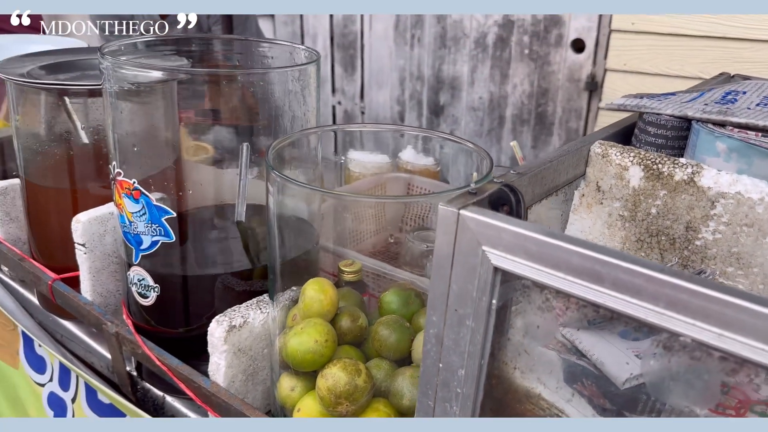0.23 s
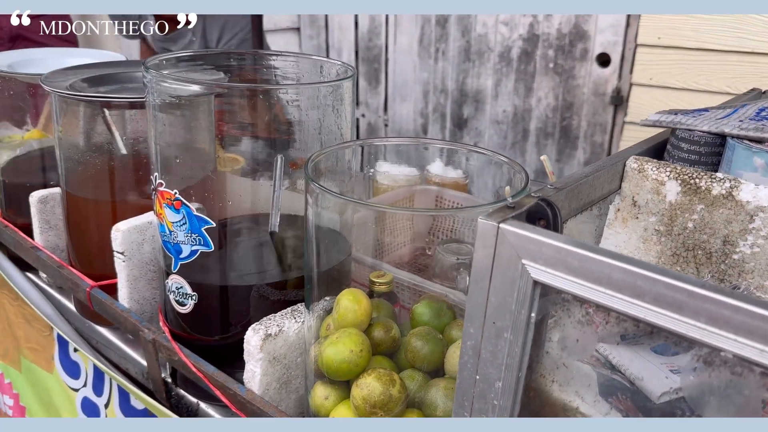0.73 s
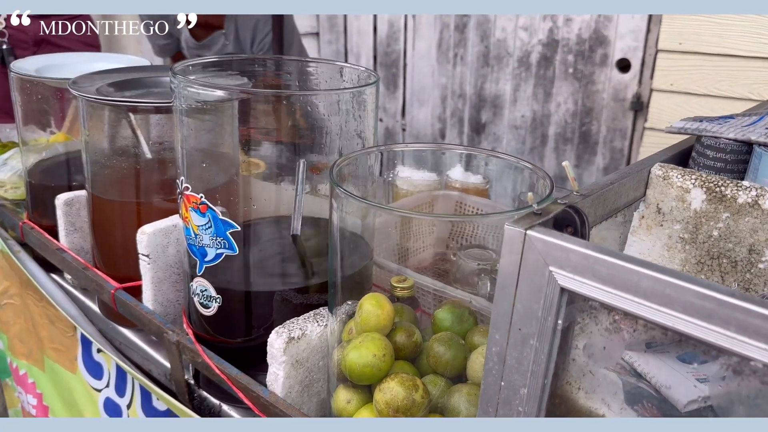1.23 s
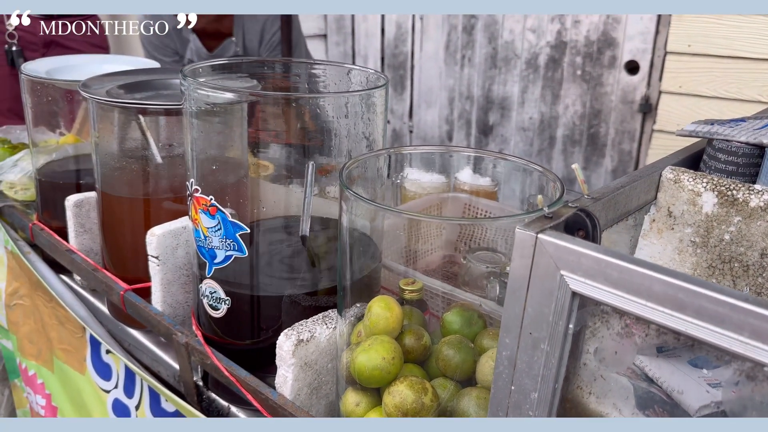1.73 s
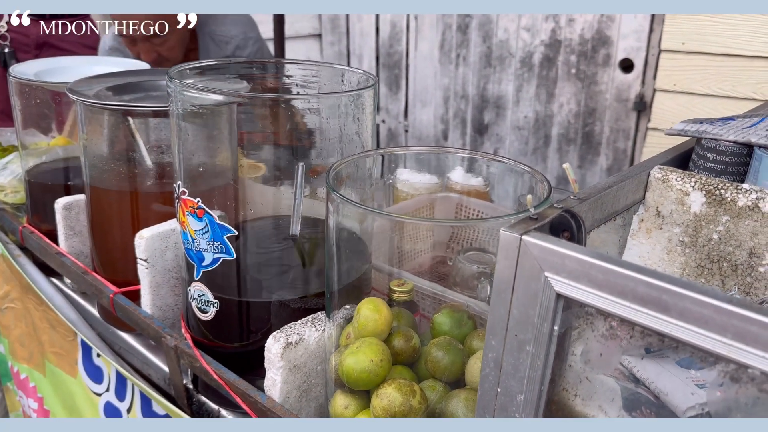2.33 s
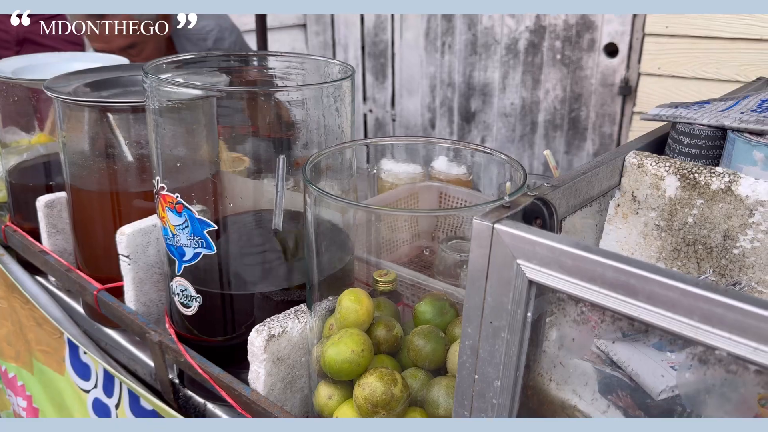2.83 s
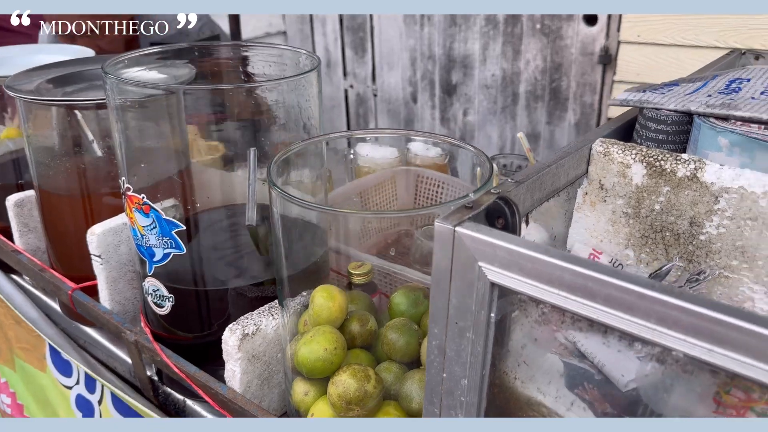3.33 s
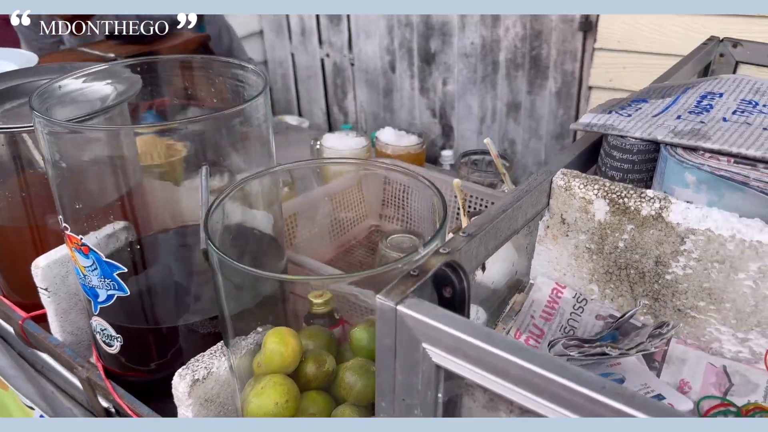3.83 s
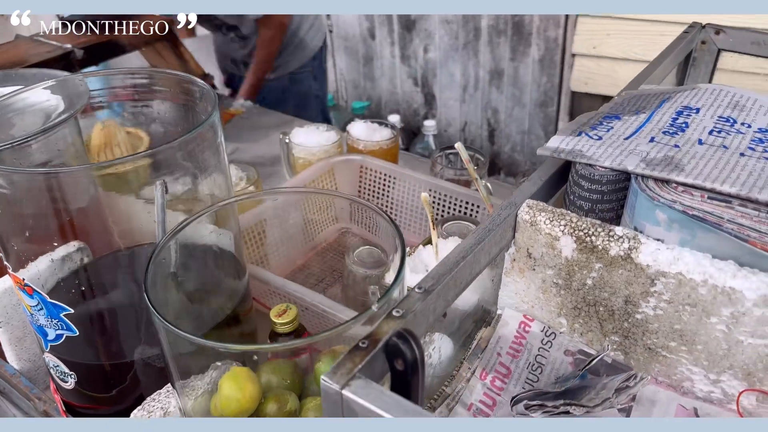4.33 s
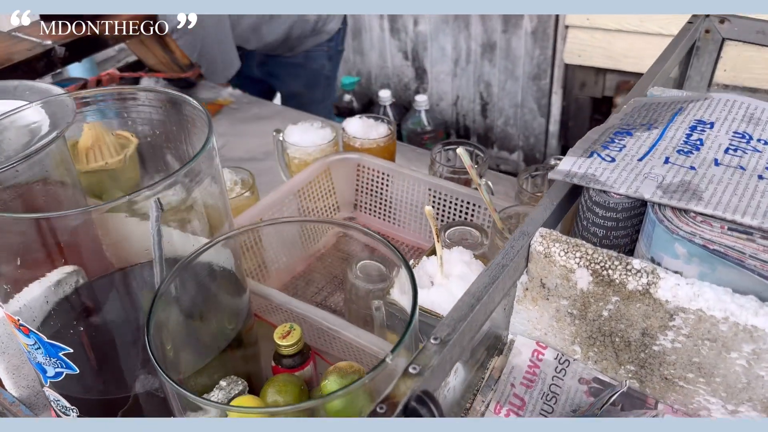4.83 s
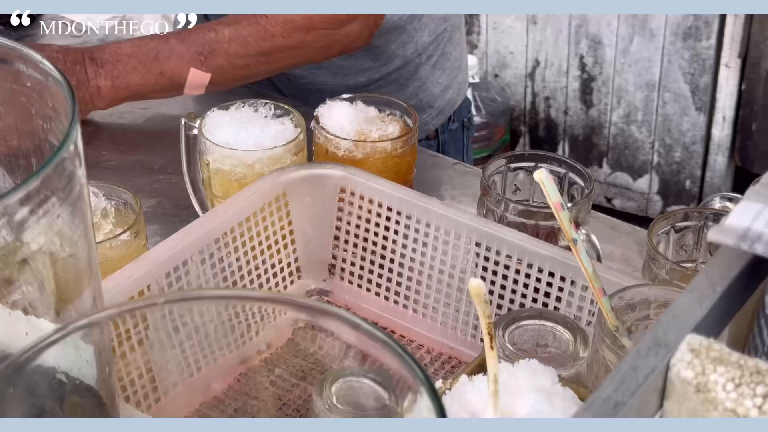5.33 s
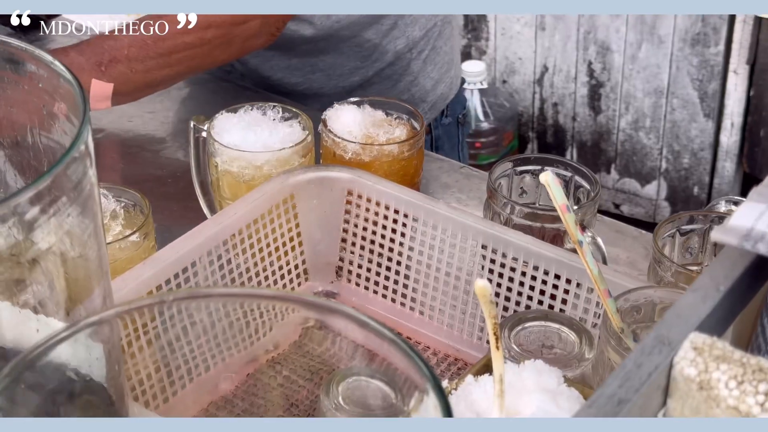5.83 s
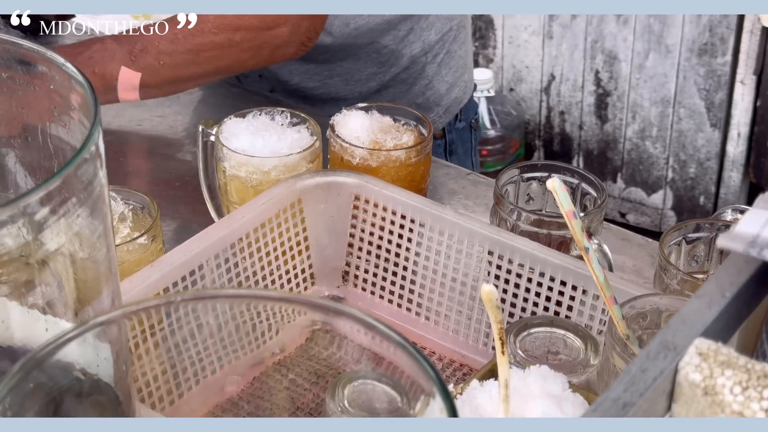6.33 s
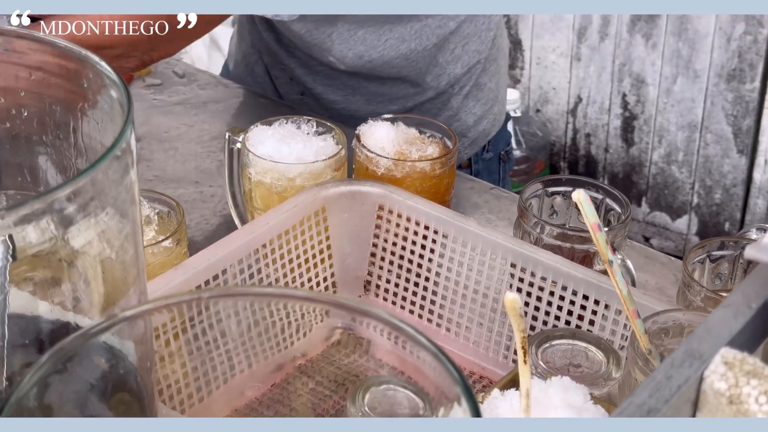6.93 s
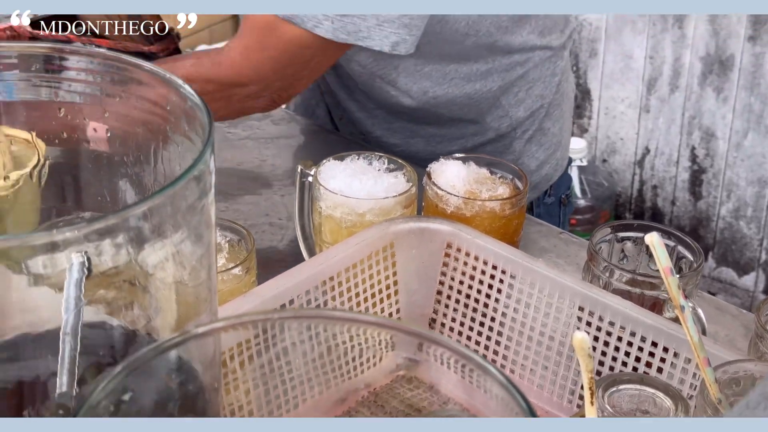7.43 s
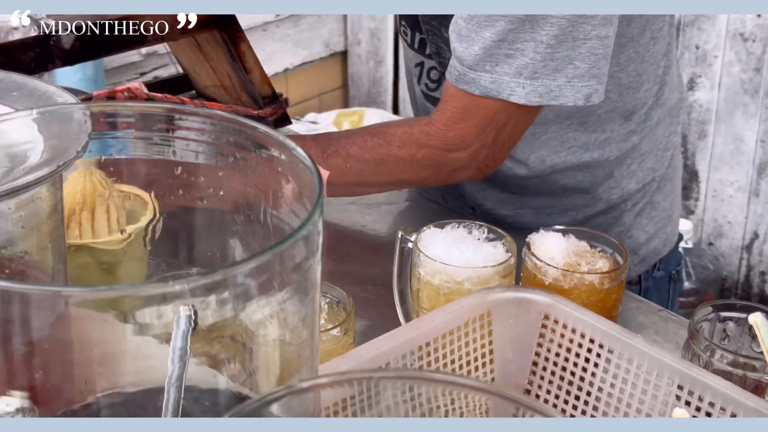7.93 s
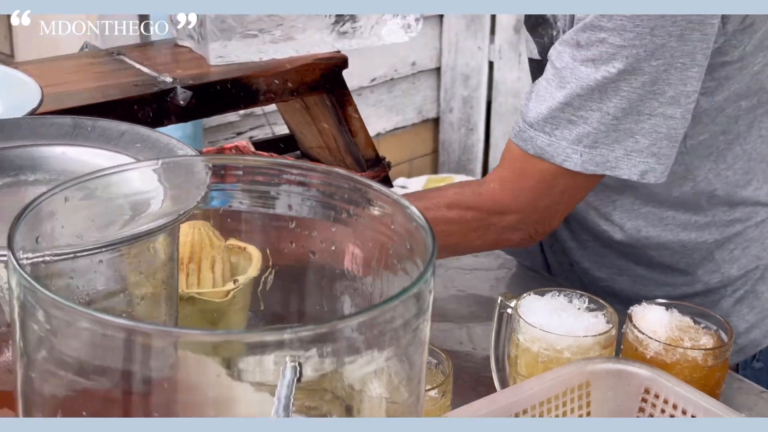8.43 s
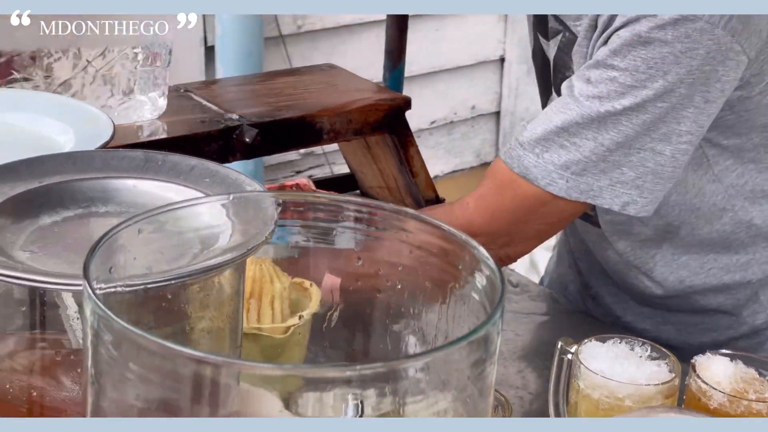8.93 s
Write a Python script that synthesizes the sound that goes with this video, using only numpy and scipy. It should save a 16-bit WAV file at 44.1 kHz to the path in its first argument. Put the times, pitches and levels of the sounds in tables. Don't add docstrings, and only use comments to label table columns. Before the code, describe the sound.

Quiet street hum, rustles, soft knocks and a far dove, then loud crunching strokes of ice pushed over a wooden plane close by.

```python
import sys
import numpy as np
from scipy import signal
from scipy.fft import rfft, irfft
from scipy.io import wavfile
from scipy.ndimage import uniform_filter1d

SR = 44100
rng = np.random.default_rng(int(sys.argv[2]) if len(sys.argv) > 2 else 0)


def transcribe(u):
    v = np.clip(np.atleast_2d(u).T, -1, 1)
    q = np.round(v * 32767).astype(np.int16)
    wavfile.write(sys.argv[1], SR, q)


def invert_db(level):
    return 10 ** (np.asarray(level, dtype=float) / 20)


N = 404838
T = np.arange(N) / SR
CLOSE_S = 5.36


def evened(x):
    return x / np.sqrt(np.mean(x ** 2) + 1e-20)


def read(points, hz):
    f, value = np.transpose(points)
    return np.interp(np.log(hz + 1), np.log(f + 1), value)


def colour(x, gain):
    return irfft(rfft(x) * gain(np.fft.rfftfreq(x.shape[-1], 1 / SR)), x.shape[-1])


def shaped(x, spectrum):
    return colour(x, lambda hz: invert_db(read(spectrum, hz)))


def band_even(x, lo_hz, hi_hz):
    return x / np.std(colour(x[0], lambda hz: (hz > lo_hz) & (hz < hi_hz)))


def smooth_twice(x, span):
    return uniform_filter1d(uniform_filter1d(x, span), span)


def drift(n, span):
    return evened(smooth_twice(rng.standard_normal(n), round(span)))


def patchy(x, patch_db, size=256):
    z = signal.stft(x, nperseg=size)[2]
    field = uniform_filter1d(rng.standard_normal(z.shape[1:]), 3, 0)
    field = evened(uniform_filter1d(field, 6, 1))
    return signal.istft(z * invert_db(patch_db * field), nperseg=size)[1][:, :x.shape[1]]


def resonate(x, hz, width):
    r = np.exp(-np.pi * width / SR)
    return signal.lfilter([1 - r, 0, r - 1], [1, -2 * r * np.cos(2 * np.pi * hz / SR), r * r], x)


def glide(x, hz, width):
    turn = np.exp(2j * np.pi * np.cumsum(hz) / SR)
    r = np.exp(-np.pi * width / SR)
    smooth = signal.lfilter([1], np.convolve([1, -r], [1, -r]), x / turn)
    return evened((turn * smooth).real)


def streak(start, stop, from_hz, to_hz, db, width):
    hz = np.geomspace(from_hz, to_hz, round((stop - start) * SR))
    drive = rng.standard_normal((2, len(hz)))
    return start, invert_db(db) * np.hanning(len(hz)) * glide(drive, hz, width)


def noise(spectrum, lo_hz, hi_hz, patch_db):
    x = shaped(patchy(rng.standard_normal((2, N)), patch_db, size=1024), spectrum)
    return band_even(x, lo_hz, hi_hz)


def fractures(n, per_s, spread_db, chatter_db):
    chatter = drift(n, 180)
    size = invert_db(spread_db * np.minimum(rng.exponential(1, n), 4))
    size = size * (rng.random(n) < per_s / SR)
    return (evened(size) + 1.65) * invert_db(chatter_db * chatter) * rng.standard_normal((2, n))


def swells(start, length, db, rise_db_per_s, fall_db_per_s):
    t, out = T[::64], 0
    for s, hold, top_db in np.broadcast(start, length, db):
        rise_db = rise_db_per_s * np.maximum(s - t, 0)
        fall_db = fall_db_per_s * np.maximum(t - s - hold, 0)
        out = out + invert_db(2 * (top_db - rise_db - fall_db))
    return np.interp(T, t, out)


def add(mix, s, sound):
    part = mix[:, round(s * SR):][:, :sound.shape[1]]
    part += sound[:, :part.shape[1]]


# frequency in Hz, density in dB per Hz.
RUMBLE = [(12, -55), (20, -38), (33, -8.5), (86, 2), (124, -2), (182, -6.5), (214, -7.5), (260, -25),
          (340, -55), (570, -120)]


def rumble():
    return noise(RUMBLE, 40, 180, patch_db=-1.0) * invert_db(np.where(T > CLOSE_S, -46, -45))


# frequency in Hz, width in Hz, level in dB.
HUM = [(495.3, 22, -51), (1443, 70, -57), (890, 110, -55), (210, 14, -51.5), (2230, 40, -60)]
# from and to, both in seconds.
HUM_SPANS = [(-1, 4.3), (.7, 4.2), (.2, 2), (3.6, 6.4), (3.5, 4.)]


def hums():
    drive = rng.standard_normal(N)
    out = np.zeros(N)
    for (start, stop), (hz, width, db) in zip(HUM_SPANS, HUM):
        fade = np.clip(np.minimum(T - start, (stop - T) / 3) / .3, 0, 1)
        tone = np.cos(2 * np.pi * np.cumsum(hz + .12 * width * drift(N, 1500)) / SR)
        band = evened(resonate(resonate(drive, hz, width), hz, width))
        out += invert_db(db - 1 + drift(N, 3400)) * fade * (tone + .6 * band)
    return out


# start in seconds, length in seconds, treble in dB, body in dB.
RUSTLES = [(0.15, 0.18, -48, -43.5), (0.335, 0.21, -44, -41.5), (0.596, 0.12, -41, -40.5),
           (0.882, 0.062, -47, -42), (1.073, 0.074, -45.5, -45), (1.287, 0.075, -50.5, -47.5),
           (1.454, .2, -47.5, -62), (1.74, 0.088, -50, -54), (1.927, 0.033, -51, -48),
           (2.35, 0.083, -50.5, -67), (2.539, 0.2, -50, -44.5), (2.995, 0.038, -53.5, -58),
           (3.5, 0.027, -62, -59), (4.235, 0.15, -52, -47), (4.78, 0.051, -48, -48.5),
           (4.892, 0.028, -52.5, -48), (5.12, 0.055, -50.5, -45.5)]


def rustle_power(column):
    rows, rise_s = np.array(RUSTLES), 0.026
    return swells(rows[:, 0] + rise_s, rows[:, 1] - rise_s, rows[:, column], 12 / rise_s, 85)


# frequency in Hz, density in dB per Hz.
RUSTLE = [(1200, 2.5), (2500, 0), (4000, -0.5), (7000, -4.5), (10000, -1.5), (13000, -4.5), (16000, -5)]


def rustling():
    leaves = invert_db(2 * (-52 - T))
    level = np.sqrt(rustle_power(column=2) + leaves)
    crackle = fractures(N, per_s=6000, spread_db=1.5, chatter_db=.8)
    crackle = shaped(patchy(crackle, patch_db=2.2), RUSTLE)
    return band_even(crackle, 1770, 10600) * np.where(T > CLOSE_S, invert_db(-58.5), level)


def traffic(wash):
    far = np.sqrt(rustle_power(column=3) + invert_db(2 * (-45.5 - 0.24 * T)))
    near = np.sqrt(invert_db(2 * -51) + drone())
    return wash * np.where(T > CLOSE_S, near, far * invert_db(-1.5))


# start in seconds, length in seconds, pitch in Hz, level in dB.
COOS = [(1.47, .07, 1170, -61), (1.73, .05, 1180, -61), (1.87, .1, 1185, -55), (2.1, .11, 1185, -55),
        (2.36, .13, 1180, -55), (2.67, .13, 1160, -55), (3.67, .12, 1900, -59)]


def dove():
    out = np.zeros((2, N))
    for s, length, hz, db in COOS:
        u = np.linspace(0, 1, round(length * SR))
        pitch = hz * (1 + .01 * np.sin(np.pi * u) - .035 * u ** 4)
        note = np.sin(2 * np.pi * np.cumsum(pitch) / SR)
        add(out, s, invert_db(db) * signal.windows.tukey(len(u), .5) * note * [[-.8], [1.2]])
    return out


# from and to in seconds, from and to in Hz, level in dB.
SCUFFS = [
    (5.05, 5.36, 196, 260, -45),
    (0.55, .72, 173, 164, -43),
    (4.212, 4.403, 780, 910, -42),
    (4.235, 4.398, 1500, 1350, -45.5),
]


def scuffs(out):
    for row in SCUFFS:
        add(out, *streak(*row, width=row[2] / 3))


# start in seconds, peak in dB, pitch in Hz,
# decay by 60 dB in seconds.
KNOCKS = [(0.034, -30.5, 504, 0.17), (0.231, -30.5, 484, 0.24), (0.629, -30.5, 417, 0.13),
          (1.118, -22, 420, .07), (1.139, -22, 465, .09), (1.834, -17.5, 339, 0.051),
          (1.935, -32, 489, 0.14), (4.238, -40, 864, 0.12), (4.264, -48, 2200, 0.055),
          (4.3, -37, 1580, 0.044), (4.279, -31, 672, 0.09), (4.299, -31, 805, 0.046),
          (4.323, -33, 910, 0.045), (4.338, -29, 520, 0.069), (4.355, -29, 733, 0.066),
          (4.904, -33.5, 634, 0.16), (5.344, -19, 148, 0.079)]


def knock(peak_db, hz, t60):
    t = np.arange(9000) / SR
    turns = hz * (t + .5 * 0.00366 * (1 - np.exp(-t / 0.003)))
    ring = 0
    for ratio, db in [(.62, -11.5), (1.0, -6), (1.45, -10.5), (2.2, -16), (3.4, -16)]:
        ring = ring + invert_db(db - 60 * ratio * t / max(t60, .02)) * np.sin(2 * np.pi * ratio * turns)
    rattle = evened(resonate(resonate(rng.standard_normal(len(t)), 1.25 * hz, hz), 1.25 * hz, hz))
    ring += invert_db(-16.0 - 35 * t / max(t60, .02)) * rattle
    return invert_db(peak_db) * np.minimum(t / .0015, 1) * ring * [[1], [.3]]


# time in seconds, level in dB.
THUMPS = [(6.6, -51), (7.355, -39), (7.5, -43), (8.02, -52), (8.375, -39), (8.58, -36), (8.9, -45)]


def thumps(wash):
    at, db = np.transpose(THUMPS)
    dull = colour(wash, lambda hz: 1 / (1 + (hz / 560) ** 4))
    return dull * np.sqrt(swells(at, 0.031, db + 3.5, 1000, 180))


def bench_pitch():
    free_hz, loaded_hz = 111.7, 150
    pressed = sum((T > row[0]) & (T < row[1]) for row in PUSHES + PULLS[3:-1])
    return free_hz + (loaded_hz - free_hz) * uniform_filter1d(np.minimum(pressed, 1.), 3000)


# frequency in Hz, width in Hz, level in dB.
BENCH = [(51.5, 9.2, -8.5), (171, 32, -5.5), (221.5, 89, -5.5)]
# time in seconds, level in dB.
JOLTS = [(5.4, -31), (5.54, -32), (5.67, -37.5), (5.79, -34), (6.04, -38), (6.34, -39), (6.61, -33),
         (6.74, -38), (6.9, -33), (7.03, -32.5), (7.4, -43), (7.5, -32), (7.72, -32.5), (7.88, -27),
         (8.02, -38), (8.39, -32.5), (8.7, -29.5), (8.81, -34.5), (9.099, -43.5)]


def bench_shake():
    near = T > CLOSE_S
    at, db = np.transpose(JOLTS)
    shake = np.sqrt(swells(at, 0, db, 151, 40))
    drive = rng.standard_normal((2, N))[:, near]
    bench = glide(drive, bench_pitch()[near], 26.0)
    for hz, width, db in BENCH:
        bench += invert_db(db) * evened(resonate(resonate(drive, hz, width), hz, 3 * width))
    out = np.zeros((2, N))
    out[:, near] = evened(bench) * shake[near]
    return out


# frequency in Hz, density in dB per Hz.
PULL_GRIT = [(200, 3.5), (500, -7), (900, -5.5), (2000, -2.5), (4000, 0), (7000, 0.5), (9500, 5.5),
             (10700, 3.5), (12500, 2), (16000, 0)]


def snap(peak_db, hz, t60, ring, edge):
    t = np.arange(6000) / SR
    burst = shaped(rng.standard_normal((2, len(t))), PULL_GRIT)
    burst = evened(burst) + ring * evened(resonate(burst, hz, 970))
    attack = 1 + edge * np.exp(-t / .002)
    return invert_db(peak_db - 15.5 - 60 * t / max(t60, .01)) * attack * burst


# frequency in Hz, density in dB per Hz.
TRAFFIC = [(150, -1), (250, -2.5), (500, 0.5), (700, -7.5), (900, -5), (1150, -12.5), (1500, -10),
           (2600, -14.5), (3200, -39)]
# start in seconds, peak in dB, ring in Hz, decay by 60 dB in seconds.
TICKS = [(0.039, -46, 2000, 0.038), (0.176, -35, 3340, 0.04), (0.234, -24, 4800, 0.032),
         (0.3555, -27, 4900, 0.037), (0.41, -26, 3610, 0.14), (1.432, -30, 9300, 0.082),
         (1.834, -29.5, 4570, 0.059), (1.9352, -21.5, 4970, 0.048), (2.3022, -34, 3600, 0.04),
         (2.336, -32.5, 4280, 0.035), (2.37, -32.5, 3660, 0.04), (2.5706, -28, 8400, 0.06),
         (3.511, -29, 5750, 0.021), (4.792, -26, 5200, 0.034)]


def street():
    wash = noise(TRAFFIC, 246, 1800, patch_db=3.0)
    out = rumble() + thumps(wash) + traffic(wash) + rustling() + bench_shake()
    for s, *tick in TICKS:
        add(out, s, snap(*tick, ring=.4, edge=2.2))
    scuffs(out)
    for s, *blow in KNOCKS:
        add(out, s, knock(*blow))
    return out


def path(row, shape):
    bite, lift, force_db, change_db, load_db = row
    rise, release, top, first_db, last_db = shape
    bite_s = .006
    end_db = force_db + change_db
    full = min(bite + bite_s + rise, lift - bite_s)
    gone = lift + release
    return [(bite - bite_s, force_db - 52, first_db),
            (bite, force_db - 26, first_db),
            (bite + bite_s, force_db - 8, first_db),
            (full, force_db, first_db / 2),
            (full + top * (lift - full), force_db + .5 * change_db, load_db),
            (lift, end_db, load_db + last_db / 2),
            (gone, end_db - 59.5, last_db),
            (gone + .045, end_db - 63.5, last_db)]


# bite in seconds, lift in seconds, cutting force in dB, force change up to the
# lift in dB, the stroke's own load on the wood in dB.
PUSHES = [(5.396, 5.642, -17.5, -6.5, 6.5), (6.822, 7.059, -19, -3.5, 5), (7.66, 7.946, -17.8, -7.5, 10),
          (8.567, 8.812, -20, -7, 11)]
PULLS = [(6.252, 6.398, -46, 0, 5), (6.4, 6.512, -34, -2, -1), (6.51, 6.575, -33, -3, -3),
         (6.575, 6.632, -33, -5, -6), (7.257, 7.364, -28, 0.5, 1), (7.355, 7.418, -31, -1.5, 3),
         (7.415, 7.474, -29.5, -2.5, 2), (8.154, 8.225, -39, 1, 4), (8.21, 8.346, -32, 1.5, 5),
         (9.127, 9.195, -51, 9, -6)]
# swell in seconds, cut short just before the lift; release in seconds
# bite in dB; load after the release in dB.
PUSH_SHAPE = (0.016, 0.1, 0.5, -8, -8)
PULL_SHAPE = (2, 0.0552, -4.1, 11, 5)


def drone():
    out = np.zeros(N)
    for rows, shape, thud_db in [(PUSHES, PUSH_SHAPE, -19), (PULLS, PULL_SHAPE, -17)]:
        for row in rows:
            s, force_db, load_db = np.transpose(path(row, shape))
            out += invert_db(2 * np.interp(T, s, thud_db + force_db + 1.06 * load_db, -200, -200))
    return out


# frequency in Hz, density in dB per Hz.
WOOD = [(600, -25), (950, -4), (1200, 0), (1500, -3), (2100, -1), (2700, -6.5), (3400, -16)]


def stroke(rows, grit, modes, body_db, ring_db):
    s, force_db, wood_db = np.transpose(rows)
    t = np.arange(s[0], s[-1], 1 / SR)
    cracks = patchy(fractures(len(t), per_s=9000, spread_db=2.6, chatter_db=.9), patch_db=1.3)
    sound = band_even(shaped(cracks, grit), 3000, 8000)
    load_db = 1.19 * np.clip(np.interp(t, s, wood_db), -12, 10)
    sound = sound + invert_db(body_db + load_db) * evened(shaped(cracks, WOOD))
    for hz, width, db in modes:
        ring = glide(cracks, hz * (1 + .025 * drift(len(t), 2000)), width + 130)
        level_db = ring_db + np.minimum(db, 0) + 1.6 * drift(len(t), 900)
        sound = sound + invert_db(level_db + (hz < 2800) * load_db) * ring
    return s[0], sound * invert_db(np.interp(t, s, force_db)) * signal.windows.tukey(len(t), 100 / len(t))


# frequency in Hz, density in dB per Hz.
PUSH_GRIT = [(200, -14), (500, -4.5), (900, -7), (2000, -3), (4000, 0.5), (7000, -1.5), (9500, -0.5),
             (11000, -3.5), (13000, -3.5), (16000, -6.5)]
# frequency in Hz, width in Hz, level in dB.
PUSH_MODES = [(1077, 45, -6), (1540, 110, -7.5), (2675, 23, -6.5), (3755, 46, 0), (4640, 58, 7),
              (6030, 100, 0), (6850, 170, -12)]
PULL_MODES = [
    [(2030, 29, -11), (2590, 220, -4.5), (4000, 51, 2), (4280, 53, 4), (5300, 130, -12), (7060, 50, 3)],
    [(1360, 240, -10), (2804, 120, 0), (5860, 27, 0), (6000, 120, -2), (6400, 34, -1), (8250, 110, -16)],
    [(1430, 320, -5.5), (1920, 44, -9), (3400, 150, 0), (6270, 120, 0), (6940, 57, -5.5), (7840, 46, -10)],
]
REGRIP_S = [7., 8.]


def strokes(out):
    for row in PUSHES:
        add(out, *stroke(path(row, PUSH_SHAPE), PUSH_GRIT, PUSH_MODES, body_db=-9.5, ring_db=-16.0))
    for row in PULLS:
        modes = PULL_MODES[np.searchsorted(REGRIP_S, row[0])]
        add(out, *stroke(path(row, PULL_SHAPE), PULL_GRIT, modes, body_db=-17.5, ring_db=-10.5))


# start in seconds, peak in dB, ring in Hz, decay by 60 dB in seconds.
CHIPS = [(5.3444, -33, 1200, 0.028), (5.8236, -36, 2670, 0.21), (6.201, -31, 7600, 0.074),
         (6.257, -28, 6020, 0.15), (6.323, -27, 2510, 0.08), (6.335, -17.5, 7310, 0.051),
         (6.356, -24, 4240, 0.074), (6.3686, -15, 3870, 0.13), (6.407, -12.5, 7500, 0.08),
         (6.494, -16, 3070, 0.057), (6.601, -5, 4600, 0.083), (7.261, -11.5, 2930, 0.15),
         (8.164, -11, 5860, 0.092), (6.294, -27, 8000, .06), (8.181, -20, 5800, .05),
         (7.435, -17, 2500, .06)]
# start in seconds, peak in dB, ring in Hz,
# decay by 60 dB in seconds.
CRUNCHES = [(5.45, -7, 7000, 0.082), (5.487, -1, 1540, 0.086), (7.781, -12, 6000, 0.092),
            (7.863, -3, 1500, 0.11), (8.67, -10, 3260, 0.09), (8.763, -3.5, 2170, 0.086),
            (5.553, -8, 4700, 0.1), (5.573, 0, 1930, 0.15), (5.629, -3, 4000, 0.054),
            (6.991, 1, 2210, 0.16), (6.287, -21, 2650, 0.15), (6.409, -10, 2720, 0.15),
            (6.524, -11, 2500, 0.12), (6.53, -12, 6940, 0.37), (6.56, -13, 7000, 0.11),
            (6.587, -12, 5800, 0.13), (6.602, -3.5, 4500, 0.074), (6.603, -3, 2670, 0.055),
            (7.269, -5, 6400, 0.13), (7.282, -9, 2720, 0.36), (7.321, -5, 8150, 0.09),
            (7.352, -12, 5500, 0.19), (7.432, -12.5, 4450, 0.2), (8.156, -17, 3400, 0.13),
            (8.166, -11.5, 5860, 0.1), (8.179, -23, 5800, 0.06), (8.228, -14.5, 1120, 0.35),
            (8.257, -12.5, 3200, 0.32), (8.307, -13, 6000, 0.16)]


def breakage(out):
    for s, *chip in CHIPS:
        add(out, s, snap(*chip, ring=0.7, edge=1.33))
    crumble = np.minimum(np.arange(6000) / SR / .004, 1)
    for s, *lump in CRUNCHES:
        add(out, s, snap(*lump, ring=.9, edge=0) * crumble)


# from and to in seconds, from and to in Hz, level in dB.
STREAKS = [(7.74, 7.92, 2500, 1800, -25.5), (5.6, 5.66, 1100, 1060, -29.5), (6.5, 6.56, 1500, 1600, -43),
           (5.395, 5.475, 7000, 7500, -20.5), (6.83, 7.07, 2950, 1600, -25), (6.53, 6.605, 2200, 6100, -33),
           (6.43, 6.5, 3600, 10000, -33), (8.24, 8.33, 1200, 1500, -35.5), (6.405, 6.45, 2000, 3400, -36)]
# from and to in seconds, ring in Hz, level in dB.
SINGS = [(5.4, 5.45, 3790, -29), (5.436, 5.485, 2070, -29), (5.465, 5.51, 4480, -28),
         (5.466, 5.514, 1460, -25), (5.475, 5.537, 2580, -27), (5.527, 5.582, 1120, -26),
         (5.53, 5.59, 4650, -25), (5.537, 5.601, 1890, -20), (5.537, 5.614, 3790, -26),
         (5.601, 5.656, 2670, -28), (5.61, 5.655, 1890, -27), (5.61, 5.656, 3880, -28),
         (6.832, 6.9, 7150, -30), (6.842, 6.94, 2690, -25), (6.86, 6.949, 6150, -26),
         (6.875, 6.917, 5770, -28), (6.898, 6.96, 1550, -27), (6.936, 6.988, 2330, -24),
         (6.972, 7.032, 4650, -27), (6.975, 7.049, 1640, -22), (7.663, 7.704, 5250, -29),
         (7.665, 7.733, 4910, -28), (7.689, 7.732, 3530, -29), (7.707, 7.779, 1550, -25),
         (7.716, 7.785, 2760, -29), (7.724, 7.774, 3880, -29), (7.724, 7.784, 8180, -28),
         (7.761, 7.82, 6030, -26), (7.762, 7.893, 1120, -24), (7.787, 7.837, 2070, -27),
         (7.843, 7.894, 2150, -28), (7.888, 7.946, 1460, -29), (8.57, 8.608, 1120, -28),
         (8.588, 8.644, 5170, -31), (8.62, 8.675, 1950, -26), (8.628, 8.675, 4310, -29),
         (8.634, 8.7, 5940, -26), (8.647, 8.705, 3270, -26), (8.665, 8.724, 1380, -24),
         (8.739, 8.784, 3450, -29), (8.739, 8.8, 5770, -30), (8.746, 8.789, 2150, -27),
         (8.776, 8.829, 1640, -31), (7.338, 7.388, 5600, -33), (7.302, 7.348, 7750, -35),
         (7.425, 7.479, 1290, -37), (8.215, 8.264, 1120, -37), (6.4, 6.441, 2500, -37),
         (6.52, 6.56, 2580, -37), (6.52, 6.585, 6980, -36)]


def singing(out):
    for row in STREAKS:
        add(out, *streak(*row, width=row[2] / 3))
    for start, stop, hz, db in SINGS:
        add(out, *streak(start, stop, hz, hz, db - .5, width=190))


def wall(x, t60, wet_db):
    t = np.arange(SR // 3) / SR
    cut = round((CLOSE_S - .1) * SR)
    tails = rng.standard_normal((6, len(t))) * invert_db(-60 * t / t60) * (t > .004)
    tails = signal.lfilter([1], [1, -.4], tails)
    place = (T[cut:] * 40 - np.arange(6)[:, None] + 3) % 6 - 3
    turns = np.maximum(np.cos(np.pi / 2 * place.clip(-1, 1)), 0)
    wet = 0
    for turn, tail in zip(turns, tails):
        tail = tail[None] / np.linalg.norm(tail)
        wet = wet + signal.oaconvolve(x[:, cut:] * turn, tail, axes=1)[:, :N - cut]
    return x + invert_db(wet_db) * np.pad(wet, [(0, 0), (cut, 0)])


def ice():
    out = np.zeros((2, N))
    strokes(out)
    breakage(out)
    singing(out)
    return wall(out, t60=0.55, wet_db=-22.5)


# frequency in Hz, level in dB.
LEAN = [(150, -63), (400, -14), (700, -5.5), (1100, -2), (1700, -4.5), (2000, -23), (2200, -61)]


def ports(strands, wide, lean, late, locked=0.87):
    comb_hz, port_s = 7875, 14 / SR
    hz = np.fft.rfftfreq(N, 1 / SR)
    a, b = rfft(strands)
    half = np.pi * port_s * np.maximum(hz - comb_hz, 0)
    mid = a * np.cos(half)
    side = np.sin(half) * (1j * locked * a + np.sqrt(max(1 - locked ** 2, 0)) * b)
    diffuse = invert_db(read(wide, hz)) * b
    leaning = (lean + 1j * late) * invert_db(read(LEAN, hz)) * a
    side += (hz < comb_hz) * (diffuse + leaning)
    return irfft(np.array([mid + side, mid - side]), N)


def clicks(x, frames, click_db):
    treble = np.diff(x, 2, append=[0, 0])[:N // 128 * 128]
    power = (treble.reshape(-1, 128) ** 2).mean(1)
    before = np.roll(uniform_filter1d(power, 9), 6)
    at = np.flatnonzero(power > invert_db(2 * click_db) * before) / 4
    return np.isin(np.arange(frames), [np.floor(at), np.ceil(at + .25)])


# from and to in Hz, wander of each edge in Hz.
MID_GAPS = [(9000, 9800, 0, 280), (12200, 13000, 260, 0), (15120, 22050, 0, 0)]
SIDE_GAPS = [(10850, 11500, 150, 120), (13800, 14400, 100, 120)]


def bands_dropped(mid, side, leak, click_db):
    hz, t, z = signal.stft([mid, side], SR, nperseg=1024)
    hz, near = hz[:, None], t > CLOSE_S
    jumps = rng.standard_normal((24, len(t) // 4 + 1))
    jumps = np.repeat(jumps, 4, axis=1)[:, :len(t)]
    steps = np.round(jumps).clip(-1, 1.5)
    steady = ~clicks(mid, len(t), click_db)
    for part, gaps, rows in [(z[0], MID_GAPS, steps[:3]), (z[1], SIDE_GAPS, steps[3:])]:
        for (lo, hi, lo_wander, hi_wander), step in zip(gaps, rows):
            part *= ~(steady & (hz > lo - lo_wander * step) & (hz < hi + hi_wander * step))
    patch = 8 + (hz[:, 0] / 400).astype(int) % 16
    leaks = (jumps[patch] + jumps[7] > leak) & (hz < 4600)
    z[1] *= ~(steady & near & ~leaks & (hz > 2100) & (hz < 8900 + 200 * steps[5]))
    z[1] *= ~(steady & ~near & (hz > 7750) & (hz < 8050 + 300 * steps[6]))
    return signal.istft(z, nperseg=1024)[1][:, :N]


# frequency in Hz, level in dB.
WIDE_FAR = [(60, -22.5), (300, -5), (700, -2.5), (1500, 1), (6500, -2.5), (7800, -3)]
WIDE_NEAR = [(60, -23.5), (300, -12), (700, -12), (1400, -10), (2000, -10.5), (2300, -22), (4500, -24),
             (7800, -43)]


def scene():
    around = street()
    far = ports(around, WIDE_FAR, lean=0.26, late=0.5) + dove() + hums()
    near = ports(around, WIDE_NEAR, lean=0.1, late=0.98)
    return np.where(T < CLOSE_S, far, near) + ports(ice(), WIDE_NEAR, lean=0.47, late=0.21)


def band_limit(x):
    return signal.sosfilt(signal.butter(12, 16510, fs=SR, output="sos"), x)


def record(dry):
    dry = 1.3 * np.tanh(dry / 1.3)
    mid, side = bands_dropped(dry.mean(0), (dry[0] - dry[1]) / 2, leak=2.1, click_db=7)
    limits = lambda hz: np.clip((15950 - hz) / 150, 0, 1) / np.sqrt(1 + (36 / (hz + 1)) ** 6)
    mix = colour(np.array([mid + side, mid - side]), limits)
    return band_limit(mix)


dry = scene()
out = record(dry)
transcribe(out)
```